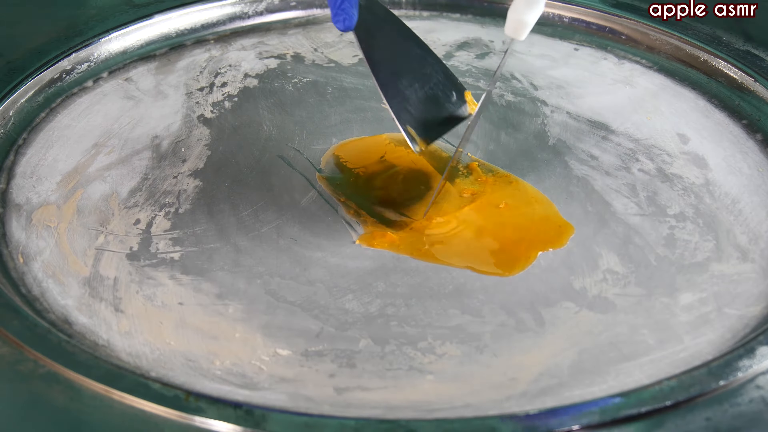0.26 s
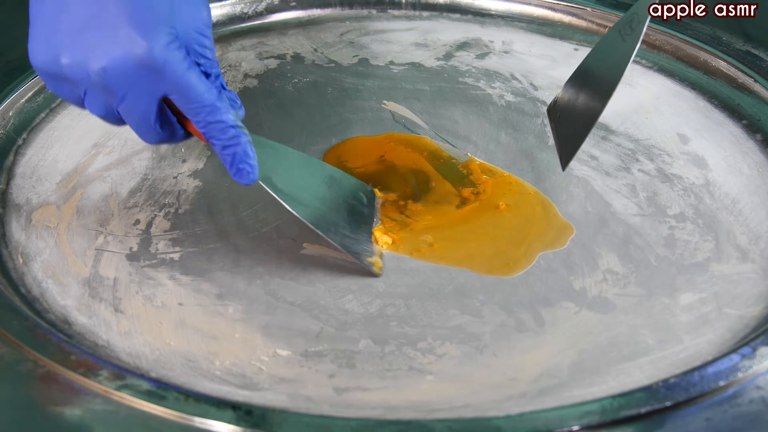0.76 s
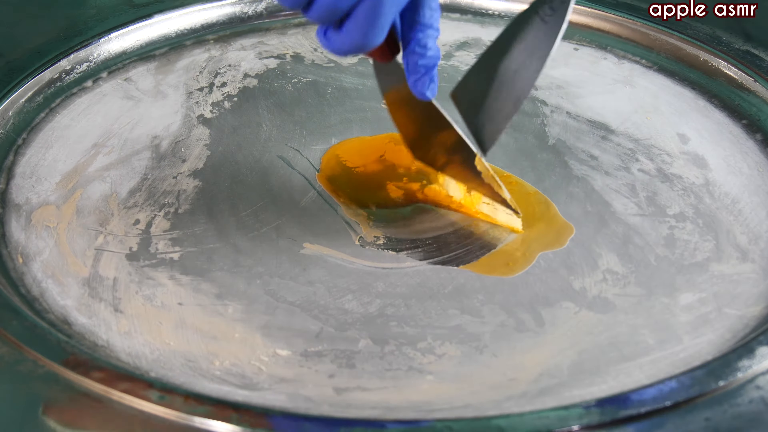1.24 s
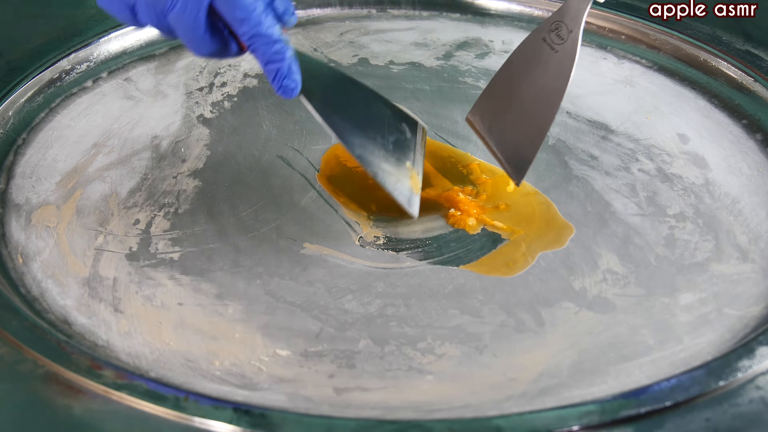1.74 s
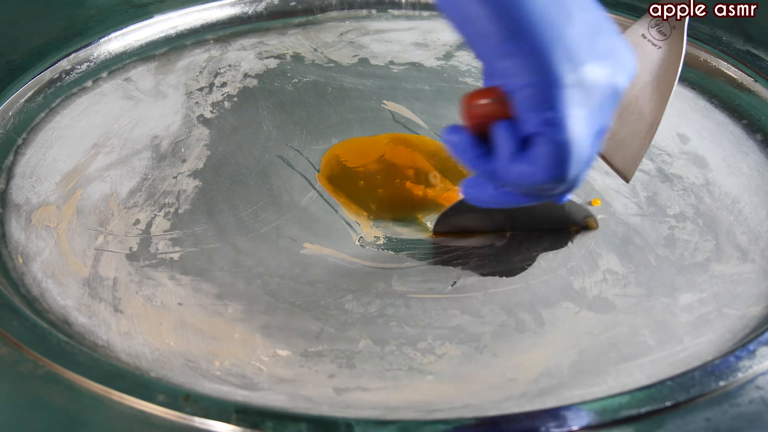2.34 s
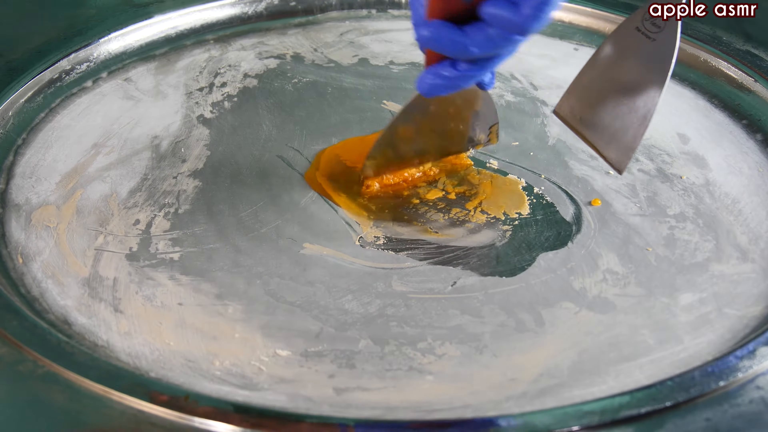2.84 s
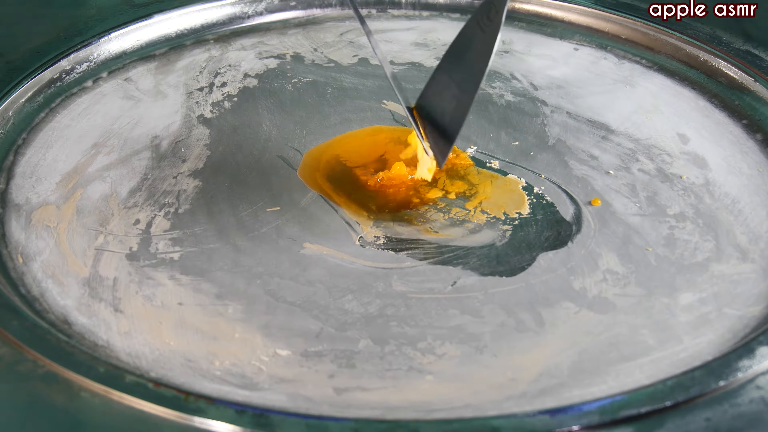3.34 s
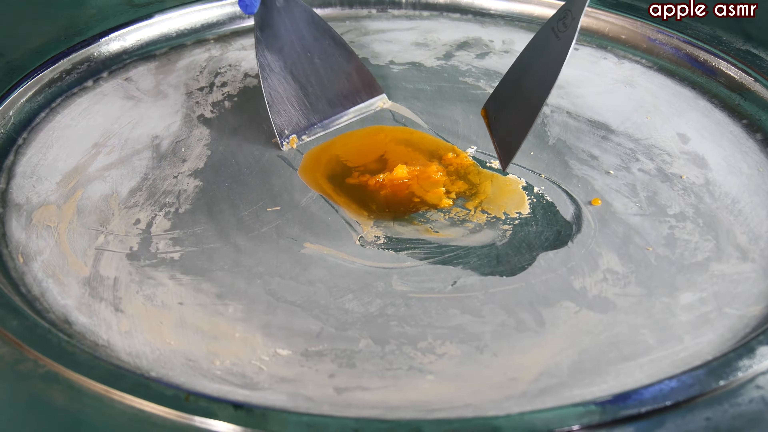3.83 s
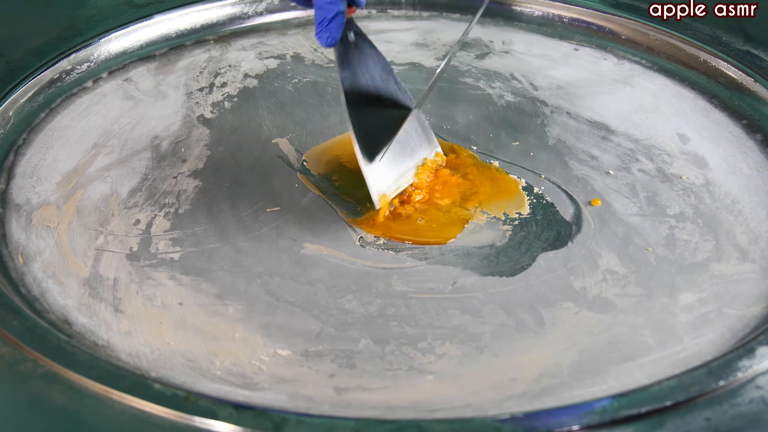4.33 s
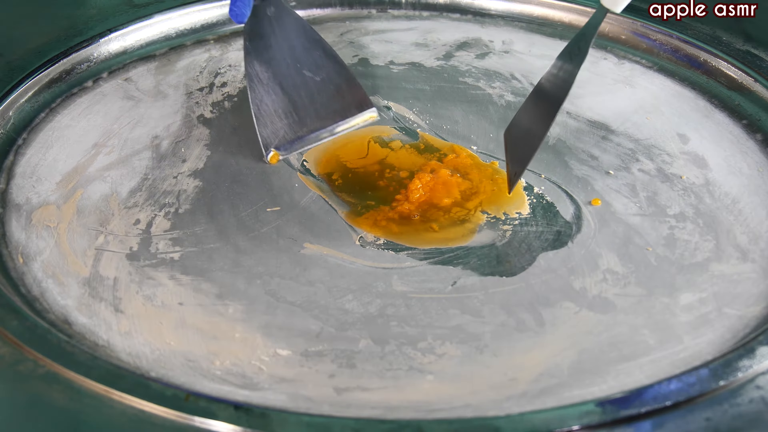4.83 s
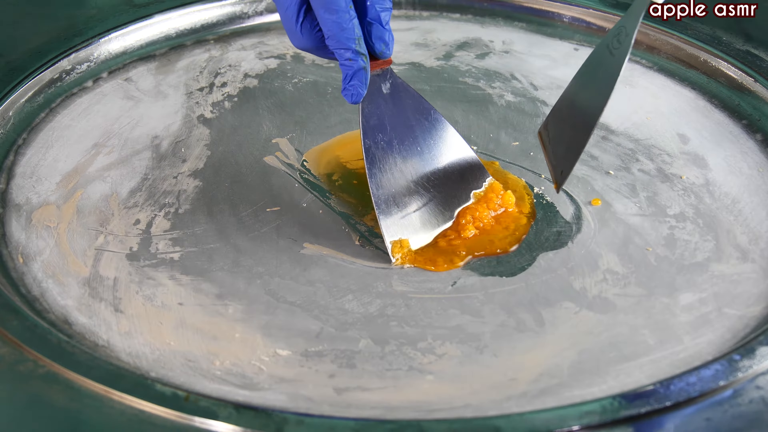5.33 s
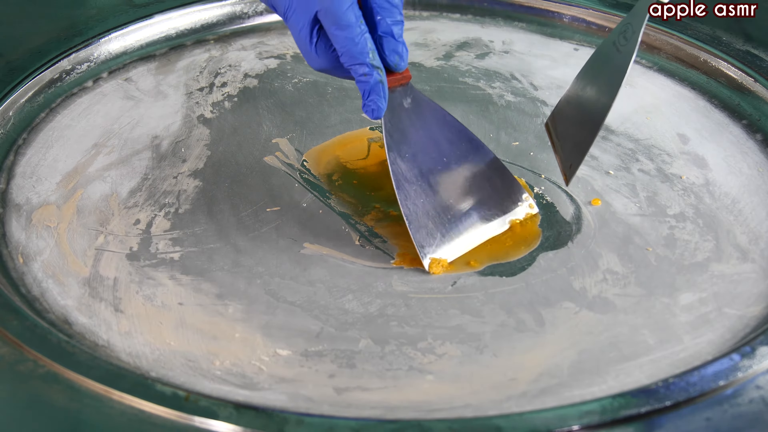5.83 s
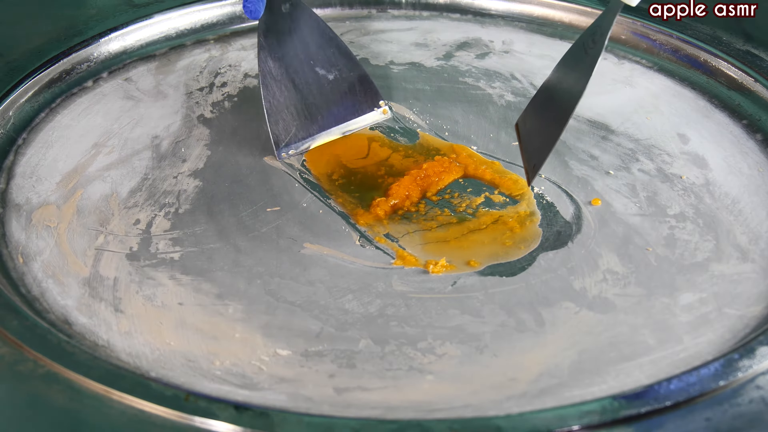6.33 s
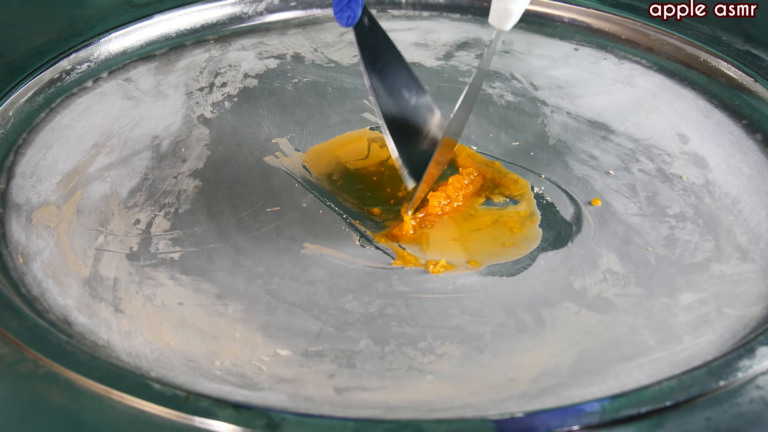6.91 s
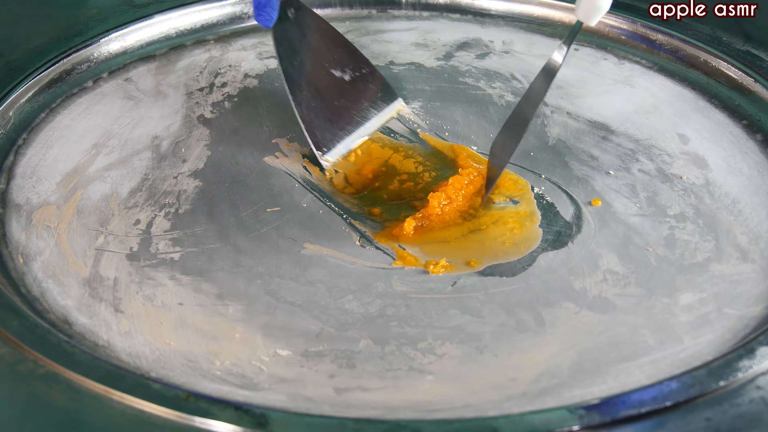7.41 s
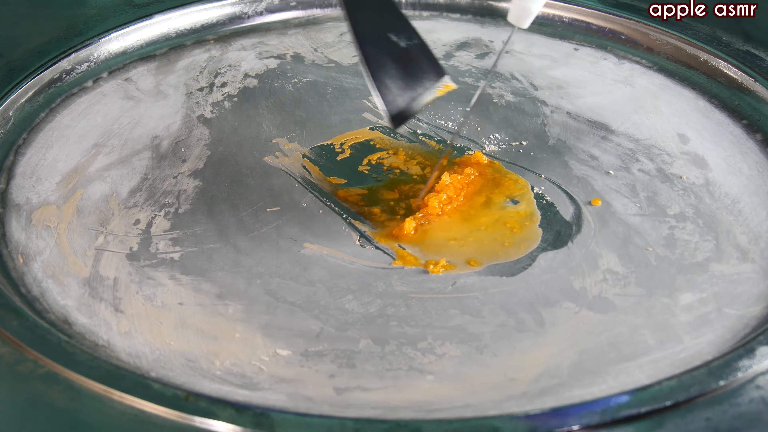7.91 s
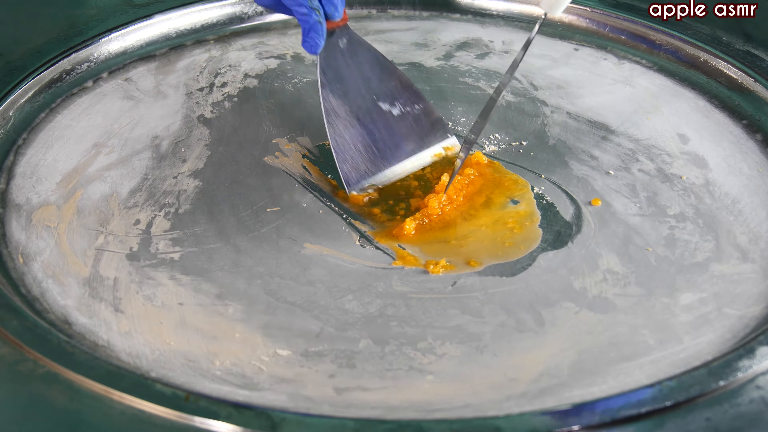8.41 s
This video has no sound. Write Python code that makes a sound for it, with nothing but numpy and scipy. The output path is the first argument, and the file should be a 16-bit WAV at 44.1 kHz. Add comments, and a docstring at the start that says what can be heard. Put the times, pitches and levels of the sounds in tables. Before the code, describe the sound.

Two steel spatulas scrape frozen syrup across a metal plate and clack sharply together, over a faint machine hum.

```python
"""Two steel spatulas work freezing syrup on a cold steel plate in a small hard room.
A cooling unit hums from the start. After a brief scrape the blades clack, slide on each other and ring.
From 0.7 s, about once a second, a blade knocks the plate's modes and is pushed through the ice: friction
makes the plate boom and rasp, crystals hiss and the edge catches on lumps. More clacks fall between
the pushes, and a loud one ends the scene."""
import sys
import numpy as np
from scipy import signal
from scipy.fft import rfft, irfft, next_fast_len
from scipy.io import wavfile

SR = 44100
rng = np.random.default_rng(int(sys.argv[2]) if len(sys.argv) > 2 else 0)


def transcribe(signal):
    """Save signal, clipped to [-1, 1], as a 16-bit WAV file at the path in sys.argv[1]."""
    frames = np.atleast_2d(signal).T
    limited = np.clip(frames, -1, 1)
    pcm = np.round(limited * 32767).astype(np.int16)
    wavfile.write(sys.argv[1], SR, pcm)


N = 381906

# Modes of the plate with the pressed blade, and of the free blades: f/Hz, level/dB, t60/s
PLATE = [(178, -24, .2), (246, -19, .3), (363, -23, .2), (1787, -19, .1), (985, -23, .46), (485, -26, .25),
         (552, -24, .25), (598, -24, .25), (800, -22, .15), (1150, -24, .25), (1410, -26, .12),
         (1950, -28, .15), (2300, -30, .12), (3413, -30, .07)]
BLADE = [(791, -27, 1.0), (3252, -24, .45), (5320, -24, .26), (7330, -17, .35), (4330, -25, .28),
         (9380, -21, .27), (4930, -24, .35), (1655, -29, .32), (1780, -31, .3), (1954, -30, .35),
         (2220, -31, .35), (2751, -33, .3), (3607, -33, .3), (4718, -28, .33), (5636, -29, .25),
         (6230, -28, .17), (6620, -30, .3), (6930, -22, .25), (8265, -28, .28), (8610, -27, .3),
         (10330, -27, .22), (11180, -23, .22), (11730, -25, .15), (11920, -27, .15), (12850, -29, .1),
         (13600, -27, .12), (13800, -29, .12), (14790, -25, .09)]
# Blade on blade: t/s, level/dB, treble/dB, chatter t60/s, ring/dB, share of the free t60,
# gain/dB of each of the first three modes (the grip frees or chokes them), slide level/dB
CLACKS = [(0.095, -4, 2, 0.052, -9, 0.6, -4, -15, -15, -45),
          (0.1295, 5, 0.5, 0.032, -13, 0.2, -19, -14, -6, -39),
          (0.1845, -27.5, -3, 0.054, -15, 0.6, -25, -9, -4, -32),
          (0.204, -17.5, 11.5, 0.07, -12, 0.5, -28, -10.5, -2.5, -21.5),
          (0.221, -16, 17, 0.056, -14, 0.9, -14, -13, -7, -42),
          (0.2575, -23, 12.5, 0.15, -2, 0.8, -30, -12, -4, -42.5),
          (0.278, -21, 13.5, 0.019, -1.5, 0.6, -31, -4, -2, -55),
          (1.3325, -1, -2.5, 0.043, -12, 0.1, -13.5, -4, -12, -33),
          (1.4562, -2.5, 3, 0.054, -22, 0.4, -14, -12, -7.5, -33),
          (1.4925, -1, 1, 0.087, -20, 0.85, -22, 11, 15.5, -40),
          (1.501, -9.5, -9.5, 0.0073, -15.5, 0.8, -18.5, -7.5, 8, -47),
          (3.2603, 13.5, 5.5, 0.018, -4.5, 0.41, -17, -21, 0, -15),
          (3.274, 0.5, 9.5, 0.058, -22, 0.9, -14, -8, 0, -30),
          (3.421, -14, 7.5, 0.027, -3.5, 1, -7, -7, 4, -36),
          (4.4155, 0.5, 3, 0.048, -17, 0.93, -20, -23, -8, -38),
          (4.42, 4, 8, 0.069, -2.5, 0.05, -31, 3, 6, -30),
           (4.484, -8, 8, 0.049, -3.5, 1, -22, -10.5, 2.5, -30),
          (6.0592, -31.5, 0.5, 0.033, -4, 0.57, -3, -12, -3, -58),
          (6.9012, 6.5, -2, 0.06, -8.5, 0.7, -1, -10.5, -6.5, -20),
          (6.9275, -1.5, 3, 0.058, -16, 0.7, -1, -6, -4, -26),
          (6.9685, -7.5, 6, 0.018, -2, 0.8, -26, -6, -5, -34.5),
          (6.984, -6.5, 11, 0.046, -2.5, 1, -13.5, -9.5, -3.5, -33),
          (7.794, 7.5, -3, 0.073, -12, 0.7, -27, -11, -15, -22),
          (7.841, -12, -14, 0.032, -12, 0.5, -25, -8, -9, -30),
          (7.866, -1, -2.5, 0.068, -10.5, 1, 1.5, 9.5, -0.5, -40),
          (8.65, 15.5, -10, 0.056, -12, 0.5, -13, -15, -20, -15)]
# Spectrum of edge against edge: f/Hz, relative level/dB
CLACK_COLOUR = [(120, -55.5), (200, -25.5), (1410, -10), (1700, -9), (3790, -6.5), (4800, -5.5), (6200, -3),
                (7180, -6), (7860, 0.5), (14900, -0.5), (15700, -18)]
# Blade on plate: t/s, level/dB, treble/dB, chatter t60/s, gain/dB of modes 1-2, 3, 4, 5 and the rest
LANDINGS = [(0.687, -28.5, 6, 0.093, 1.5, -1, 8, -8, -8), (0.695, -16, -1.5, 0.11, -1.5, -14, 1.5, -3, -6),
            (1.947, -14, 11.5, 0.022, -8, -18, 7, -26, -8),
            (1.955, -10, 1, 0.056, -25, 0.5, -13, -10.5, -14),
            (2.746, -31.5, -7, 0.032, -25, -18, -18, 9, -5.5),
            (3.824, -13, -7.5, 0.12, -5.5, -4, 5, -16, -9), (3.845, -18.5, -7, 0.068, 4.5, -10, 3, -22, -4),
            (4.8337, -12.5, -3, 0.079, -12, 0.5, -3.5, -8.5, -8.5),
            (5.856, -36.5, -28, 0.025, 15, 1, -1.5, -7, 2.5),
            (6.079, -36.5, 1, 0.051, -7, -16, 17, 1.5, -16),
            (6.388, -4.5, 1.5, 0.029, -22, -3, -19, -21.5, -17.5),
            (7.321, -14, -4, 0.1, -1.5, -7.5, 4.5, -24, -15), (8.246, -13, -1, 0.1, -2, -3.5, 5, -13, -7.5)]


def from_db(db):
    return 10 ** (np.asarray(db) / 20)


def rms_one(x):
    return x / np.sqrt(np.mean(x ** 2) + 1e-20)


def at_hz(points, hz):
    return np.interp(np.log(hz), np.log(np.array(points)[:, 0]), np.array(points)[:, 1])


def butterworth(x, kind, hz, order=4):
    return signal.sosfilt(signal.butter(order, hz, kind, fs=SR, output="sos"), x)


def colour(x, spectrum):
    """Spectral shaping by (f/Hz, level/dB) points, scaled to rms 1."""
    size = next_fast_len(N)
    hz = np.maximum(np.fft.rfftfreq(size, 1 / SR), 1)
    return rms_one(irfft(rfft(x, size) * from_db(at_hz(spectrum, hz)), size)[:N])


def drift(rate_hz, count):
    """Random modulation: rows of low-passed noise of spread 1, in steps of 64 samples."""
    r = np.exp(-128 * np.pi * rate_hz / SR)
    noise = rng.standard_normal((count, N // 64 + 1001))
    slow = signal.lfilter([1], [1, -2 * r, r * r], noise)[:, 1000:]
    return np.repeat(slow / slow.std(), 64, axis=1)[:, :N]


def ring(force, hz, t60):
    """Damped resonator: a unit impulse starts a decaying sine of height 1."""
    r, w = from_db(-60 / (t60 * SR)), 2 * np.pi * hz / SR
    return signal.lfilter([0, np.sin(w)], [1, -2 * r * np.cos(w), r * r], force + 1e-18)


def grains(per_s, spread_db):
    """Shot noise: random micro-impacts of uneven size."""
    sizes = from_db(spread_db * np.minimum(rng.exponential(1, N), 5)) * rng.choice([-1, 1], N)
    return rms_one(sizes * (rng.random(N) < per_s / SR))


def cooler():
    """Machine noise: motor tones over a low rumble that comes and goes, and the air of the room."""
    hum = [(100.2, -66), (55.6, -76.5), (126, -79), (196, -80), (314, -88)]  # motor tones: f/Hz, rms level/dB
    rumble_levels = [(0.0, -67), (0.51, -82), (1.01, -74), (1.13, -63), (1.49, -69), (1.74, -60.5),
                     (2.07, -65.5), (2.44, -76), (3.33, -77.5), (3.5, -86.5), (4.41, -73.5), (4.72, -74.5),
                     (4.99, -66.5), (5.91, -67), (6.59, -80.5), (8.2, -70.5), (8.47, -66), (8.66, -66)]  # rumble envelope: t/s, level/dB
    t, sway = np.arange(N) / SR, drift(6, count=len(hum))
    tones = sum(np.sqrt(2) * from_db(db + .8 * w) * np.sin(2 * np.pi * hz * t)
                for (hz, db), w in zip(hum, sway))
    rumble = colour(rng.standard_normal(N),
                    [(15, -24.5), (35, -16), (48, -6.5), (60, 6.5), (75, 1), (110, -28), (400, -81.5)])
    air = colour(rng.standard_normal(N),
                 [(71, -37), (120, -5.5), (177, -8.5), (240, -10.5), (333, -7), (354, -16.5),
                  (384, -15.5), (452, -35), (2360, -44.5), (15700, -58)])
    return tones + from_db(np.interp(t, *np.transpose(rumble_levels))) * rumble + from_db(-74) * air


def push_envelopes():
    """Amplitude envelopes of boom, rasp, hiss and top; ice piling on the blade damps the boom."""
    paths = [
        [(0.0, -45, -2.5), (0.074, -53.5, -20), (0.088, -36, -7)],
        [(0.72, -42, -3), (0.732, -42.5, -3), (0.898, -49, -2), (0.998, -43, -2.5), (1.124, -47, -5.5),
         (1.22, -59, -20.5), (1.25, -59, -23)],
        [(1.97, -31, -12), (1.98, -38, -6.5), (2.176, -50.5, 0), (2.702, -45, -2.5), (2.736, -54.5, 9.5),
         (2.748, -41.5, 1), (2.9, -59, -12)],
        [(3.86, -29, -2), (3.878, -43, -10), (3.898, -41, -5.5), (3.998, -46.5, -3), (4.2, -40, -11.5),
         (4.354, -50, -18.5), (4.4, -53, -6)],
        [(4.86, -36, -23), (4.92, -46.5, -1.5), (5.05, -39.5, -5), (5.142, -42, -7.5), (5.364, -48, -7),
         (5.44, -56.5, -20.5), (5.5, -62.5, -6)],
        [(5.87, -57.5, -45), (5.944, -65, -4), (6.04, -69, 1), (6.066, -55.5, 13), (6.082, -52, 4),
         (6.1, -69.5, 1), (6.2, -73, -7)],
        [(6.415, -42, -9.5), (6.465, -46.5, -4.5), (6.581, -43.5, -6), (6.617, -35.5, -7.5), (6.651, -41, -7),
         (6.739, -42, -9), (6.885, -55.5, -13)],
        [(7.345, -39, -11), (7.381, -47, -5), (7.487, -36, -6), (7.619, -39.5, -3), (7.699, -42.5, -6),
         (7.705, -39, -15.5), (7.78, -47, -18)],
        [(8.27, -30, -4), (8.284, -36.5, -9), (8.324, -42, -4.5), (8.44, -45, 3), (8.452, -38, -4),
         (8.49, -45, -1), (8.64, -51.5, -9.5)],
    ]  # course of each push: t/s, rasp level/dB, hiss over rasp/dB
    free_booms = [-10.5, 1, -2.5, 5, -1.5, 7.5, -5.5, 1.5, 1]  # how freely the plate booms in each push: level over rasp/dB
    t, gains, fade_s = np.arange(N) / SR, np.zeros((4, N)), .015
    for path, free_db in zip(paths, free_booms):
        s, rasp_db, hiss_db = np.transpose(path)
        rasp_db, hiss_db = np.interp(t, s, rasp_db), np.interp(t, s, hiss_db)
        boom_db = free_db - np.clip(34 * (t - s[0]), 0, 18.5)
        top_db = hiss_db + 1.5 + 1.2 * np.clip(hiss_db, -9, -1)  # stronger hiss is also brighter
        levels_db = [rasp_db + boom_db, rasp_db, rasp_db + hiss_db, rasp_db + top_db]
        gate = np.interp(t, [s[0], s[0] + fade_s, s[-1] - fade_s, s[-1]], [0, 1, 1, 0])
        gains += from_db(np.minimum(levels_db, 0)) * gate
    return gains


def rubbed(modes, force, t60_share):
    """Forced vibration: friction drives modes that contact damps. White force of rms 1 gives rms 1."""
    power = sum(from_db(2 * db) * t60_share * t60 for hz, db, t60 in modes) * SR / (4 * np.log(1000))
    return sum(from_db(db) * ring(force, hz, t60_share * t60) for hz, db, t60 in modes) / np.sqrt(power)


def streaks(force):
    """Varying modal coupling: close treble modes of the bent blade sound in turn as the edge shifts."""
    pitches = np.geomspace(1900, 12000, 32) * rng.uniform(.98, 1.02, 32)
    gains = from_db(5 * drift(6, count=32))
    return rms_one(sum(ring(force * gain, hz, t60=.028) * hz ** .3 for hz, gain in zip(pitches, gains)))


def pushes():
    """Friction noise: as the edge shaves ice, low plate modes boom, middle ones rasp, crystals hiss."""
    # Spectra of the three layers: f/Hz, relative level/dB
    boom_colour = [(120, -41.5), (160, .5), (450, 2), (600, -14), (3000, -72)]
    rasp_colour = [(210, -39), (350, -11.5), (599, 10), (908, 0), (1140, 9.5), (1940, 5), (3200, -13.5),
                   (4160, -39.5), (7040, -120)]
    hiss_colour = [(1290, -16), (2200, -2.5), (2370, 0.5), (3580, 2), (4250, -1.5), (4580, -2), (11000, 1),
                   (12700, 3), (15700, -8.5)]
    boom, rasp, hiss, top = push_envelopes()
    rough = from_db(1.5 * drift(35, count=2))
    force, crystals = grains(8000, 2.5) * rough[0], grains(10000, 2.5) * rough[1]
    low = rubbed(PLATE[:3], boom * force, t60_share=.6)
    low += from_db(-10.5) * boom * colour(force, boom_colour)
    shifting = from_db(2.5 * drift(5, count=2))  # the pressed blade favours now lower, now higher modes
    middle = from_db(-10) * rubbed(PLATE[4:9], rasp * force * shifting[0], t60_share=.54)
    middle += from_db(-13) * rubbed(PLATE[9:-1], rasp * force * shifting[1], t60_share=.26)
    middle += from_db(-3.5) * rasp * colour(force, rasp_colour)
    shaving = colour(crystals + from_db(-4) * streaks(crystals), hiss_colour)
    dull, bright = butterworth(shaving, "low", 7000), butterworth(shaving, "high", 7000)
    return low + middle + hiss * rms_one(dull) + top * rms_one(bright)


def chatter(blows, force, spectrum, split_hz):
    """Contact chatter: the edges rattle after each blow, in two bands that decay exponentially."""
    noise = colour(force, spectrum)
    bass = rms_one(butterworth(noise, "low", split_hz))
    treble = rms_one(butterworth(noise, "high", split_hz))
    out, t = np.zeros(N), np.arange(SR // 2) / SR
    for s, db, treble_db, t60 in np.array(blows)[:, :4]:
        i = round(s * SR)
        envelope = (from_db(db - 14 - 60 * t / t60) * np.minimum(t / .0011, 1))[:N - i]
        span = slice(i, i + len(envelope))
        out[span] += envelope * (.42 * bass[span] + from_db(treble_db) * treble[span])
    return out


def clacks():
    """Impact of steel edges: they rattle, ring and slide; the blades are too small to radiate bass."""
    force = grains(9000, 3.6)
    rattle = force + rubbed(BLADE, force, t60_share=.15)
    ringing = blades_ring()
    contact = chatter(CLACKS, rattle, CLACK_COLOUR, split_hz=2420)
    return butterworth(contact + slides() + ringing, "high", 473)


def blades_ring():
    """Beating: both blades ring freely, slightly apart in pitch, until a later contact damps them."""
    hz, db, t60 = np.transpose(BLADE)[:, :, None]
    contacts = np.sort([row[0] for row in CLACKS + LANDINGS] + [N / SR + 1])
    out, release_s = np.zeros(N), .003
    scatter = rng.normal(0, 1, (len(CLACKS), 3, len(BLADE), 1))
    for (s, peak_db, _, _, ring_db, t60_share, *grip_db, _), (strength, tune, twin) in zip(CLACKS, scatter):
        i, lasts = round(s * SR), contacts[contacts > s + .015][0] + release_s - s
        t = np.arange(min(round(lasts * SR), N - i)) / SR
        held_db = np.append(grip_db, -6 + 5.5 * strength[len(grip_db):, 0])[:, None]
        phase = 2 * np.pi * hz * (1 + .001 * tune) * t
        waves = np.sin(phase) + .5 * np.sin(phase * (1 + .003 * twin))
        modes = from_db(peak_db + ring_db + db + held_db - 60 * t / (t60 * t60_share)) * waves
        out[i:i + len(t)] += modes.sum(axis=0) * np.minimum((lasts - t) / release_s, 1)
    return out


def slides():
    """Sliding friction: one edge wipes along the other, making bright noise and driving blade modes."""
    reach_s, parting_s, fall_db_per_s = .17, .046, 53
    force = grains(6000, 3) * from_db(2.5 * drift(45, count=1)[0])
    wipe = colour(force, CLACK_COLOUR) + from_db(-7) * rubbed(BLADE, force, t60_share=.2)
    t, gain, starts = np.arange(N) / SR, np.zeros(N), [row[0] for row in CLACKS]
    for (s, *_, db), following in zip(CLACKS, starts[1:] + [np.inf]):
        end = following if following - s < reach_s else s + parting_s  # in touch between close clacks
        gate = np.interp(t, [s, s + .002, end, end + .002], [0, 1, 1, 0])
        gain += from_db(db - fall_db_per_s * np.abs(t - s)) * gate
    return gain * rms_one(wipe)


def landings():
    """Impulse excitation: the blade knocks each plate mode with a strength set by where it lands."""
    rows, knock = np.array(LANDINGS), np.zeros(N)
    onsets = np.round(rows[:, 0] * SR).astype(int)
    scatter_db = rng.normal(0, 1, (len(rows), len(PLATE)))
    for k, (hz, db, t60) in enumerate(PLATE):
        blows, place_db = np.zeros(N), rows[:, np.clip(k + 3, 4, 8)]
        blows[onsets] = from_db(rows[:, 1] + place_db + db + scatter_db[:, k])
        knock += ring(blows, hz, t60)
    cushioned = butterworth(knock, "low", 3000, order=2)  # the ice film softens the contact
    spectrum = [(71, -41), (120, -12), (320, -4), (1450, -14), (1810, 3), (2510, -12.5), (3340, -2),
                (6820, -11), (7400, -7), (15700, -16.5)]  # edge against plate: f/Hz, relative level/dB
    return chatter(LANDINGS, grains(9000, 3), spectrum, split_hz=1500) + cushioned


def catches():
    """Transient excitation: the edge catches on a lump of ice, and the scuff rings one treble mode."""
    lumps = [(0.956, -28, 9800), (2.145, -23, 8200), (2.2184, -23, 7460), (2.2335, -18, 5570),
             (2.6224, -25, 3400), (2.8689, -41.5, 2770), (3.1102, -56.5, 2510), (4.1285, -43.5, 2436),
             (4.359, -40, 4170), (4.983, -17.5, 3000), (5.0514, -15.5, 1970), (5.4792, -45.5, 4330),
             (6.535, -19.5, 1940), (6.5843, -19, 1940), (6.6104, -22, 4640), (6.6815, -27.5, 2240),
             (7.747, -35.5, 3240), (8.4447, -33, 3130)]  # catches on the ice: t/s, level/dB, f/Hz
    out, length = np.zeros(N), 4000
    decay = from_db(-60 * np.arange(length) / SR / .025)
    for s, db, hz in lumps:
        scuff, i = rng.standard_normal(length) * decay, round(s * SR)
        catch = .6 * butterworth(scuff, "high", 1800) + .05 * ring(scuff, hz, t60=.06)
        out[i:i + length] += from_db(db - 10) * catch
    return out


def room(x):
    """Diffuse reverberation: convolution with noise that dies faster in the treble."""
    decay_times = [(250, .45), (700, 0.61), (1500, .55), (3000, .49), (6000, 0.45), (10000, .34),
                   (13000, .25), (15500, .19)]  # reverberation time: f/Hz, t60/s
    t, edges, tail = np.arange(SR) / SR, 90 * 2 ** np.arange(0, 7.6, .5), 0
    for low, high in zip(edges, edges[1:]):
        band = butterworth(rng.standard_normal(SR), "band", [low, high])
        tail = tail + band * from_db(-60 * t / at_hz(decay_times, np.sqrt(low * high)))
    tail *= np.minimum(t / .003, 1)  # echoes build up
    return signal.fftconvolve(x, tail / np.sqrt(np.sum(tail ** 2)))[:N]


def scene():
    """Superposition of the steel's direct sound, its reverberation and the cooling unit."""
    steel = clacks() + butterworth(landings() + pushes() + catches(), "high", 175)
    return (steel + from_db(-9) * room(steel) + cooler())[None]


def record(dry):
    """Hard clipping flattens the loudest clacks; a steep low-pass cuts the highest treble."""
    return signal.sosfilt(signal.cheby2(12, 50, 16400, fs=SR, output="sos"), np.clip(dry, -.95, .95))


dry = scene()
out = record(dry)
transcribe(out)
```